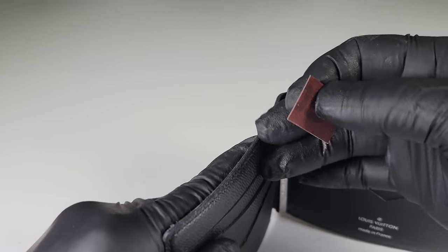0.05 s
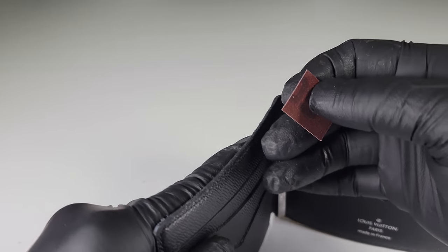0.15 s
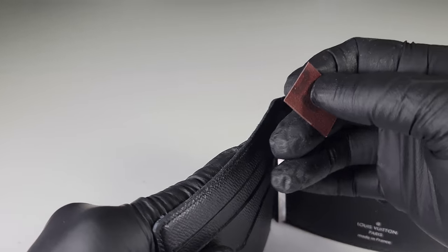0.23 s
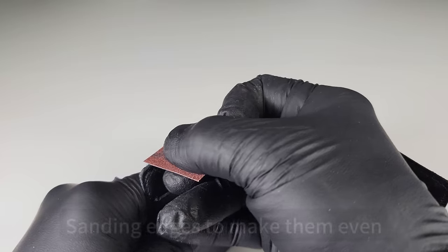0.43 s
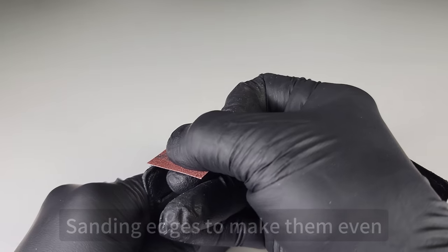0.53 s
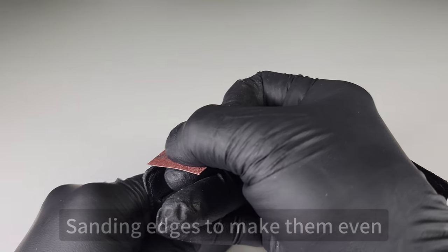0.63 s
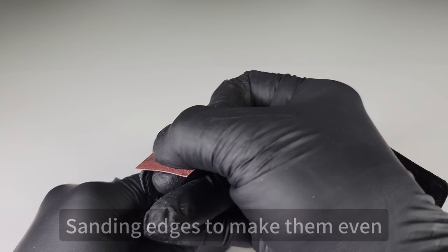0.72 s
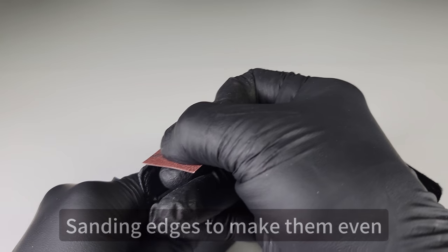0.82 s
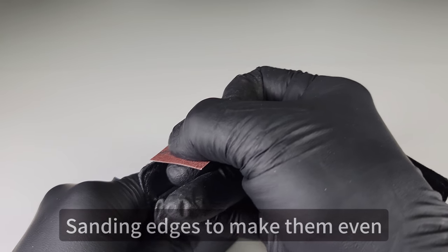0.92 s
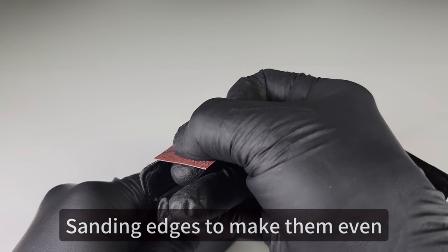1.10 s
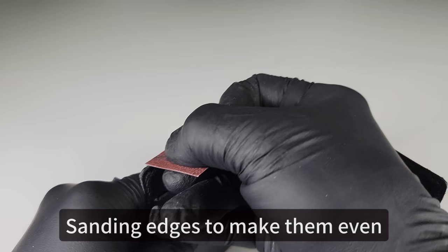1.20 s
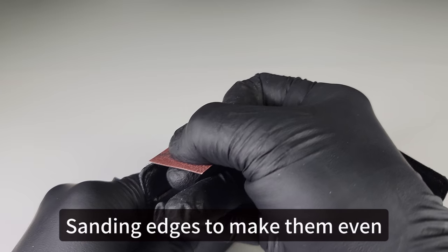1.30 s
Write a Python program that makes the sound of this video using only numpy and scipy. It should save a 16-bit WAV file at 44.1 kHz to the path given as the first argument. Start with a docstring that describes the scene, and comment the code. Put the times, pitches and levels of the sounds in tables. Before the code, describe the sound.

Close sanding of a leather edge in a quiet room: the paper slides into place, a hand knocks the table, and quick back-and-forth strokes hiss and rasp, mixed with a few sharp paper clicks and dull handling thumps.

```python
"""Gloved hands sand the edge of a leather wallet over a table, close to the microphone in a quiet room.
First the sandpaper slides into place with a light hiss, and a hand knocks the table, which rings.
Then short back-and-forth strokes begin: the grit hisses and the leather rasps. The paper snaps on
the edge, twice clearly, and the pushes of the hands rock the table with soft low thumps.
A low room murmur and faint hums lie underneath throughout."""
import sys
import numpy as np
from scipy import signal
from scipy.fft import rfft, irfft
from scipy.io import wavfile

SR = 44100
rng = np.random.default_rng(int(sys.argv[2]) if len(sys.argv) > 2 else 0)


def generate_wav(sig):
    """Save sig (samples, or channels by samples) to the path in sys.argv[1] as 16-bit PCM at SR."""
    pcm = np.round(np.clip(np.atleast_2d(sig).T, -1, 1) * 32767).astype(np.int16)
    wavfile.write(sys.argv[1], SR, pcm)


N = 59535
T, HZ = np.arange(N) / SR, np.fft.rfftfreq(N, 1 / SR)

# Strokes close to the microphone: peak_s, rise_s, fall_s, hiss_db, rasp_db
STROKES = [(0.721, 0.053, .11, -74, -60), (0.856, 0.031, 0.08, -56, -42.5), (1, 0.04, 0.027, -55.5, -47.5),
           (1.045, 0.0098, 0.023, -69.5, -59.5), (1.126, 0.066, 0.049, -58.5, -52),
           (1.242, 0.057, 0.036, -61, -52.5), (1.352, 0.035, .04, -59.5, -58)]
# Tone of the grit and of the leather: frequency_hz, density_db
GRIT_TONE = [(900, -11.5), (2000, -19), (2600, -7.5), (3200, -10.5), (4300, 0), (5100, 2), (5700, 0),
             (6300, 2), (6750, 4.5), (7200, -11), (7900, -10), (8500, -17.5), (9800, -11.5), (12500, -21),
             (16000, -26)]
RASP_TONE = [(60, -9), (150, -4), (260, 9.5), (390, 7.5), (500, -5), (800, -5), (1000, -9), (1400, -7),
             (1900, -21.5), (2500, -16), (3200, -29), (6000, -57)]
# Likeness of the two channels: frequency_hz, correlation
GRIT_LIKENESS = [(2000, 0.22), (6500, 0.57), (12000, 0.34)]
RASP_LIKENESS = [(200, 0.14), (1500, 0.21)]
# Both sit to the right: frequency_hz, left_minus_right_db
GRIT_LEAN = [(2000, -33), (4500, -8), (9000, -3.5)]
RASP_LEAN = [(200, -6.5), (650, 0), (1300, -11.5), (2500, -3)]
def sanding():
    """Each stroke drags grit over the edge: the paper hisses and the leather rasps."""
    hiss = sum(amp(db) * swell(s, rise, fall) for s, rise, fall, db, _ in STROKES)
    rasp = sum(amp(db) * swell(s, rise, fall) for s, rise, fall, _, db in STROKES)
    grit = grains()
    paper = hiss * colour(grit, GRIT_TONE, GRIT_LIKENESS, GRIT_LEAN)
    leather = rasp * colour(grit, RASP_TONE, RASP_LIKENESS, RASP_LEAN)
    return paper + leather


# Paper sliding under the glove: peak_s, rise_s, fall_s, level_db
SLIDES = [(.075, 0.12, .12, -61), (0.119, 0.017, .03, -60.5), (.205, 0.021, .04, -87),
          (.258, 0.057, 0.043, -62)]
SLIDE_TONE = [(710, -52), (1200, -23), (1410, -23), (1590, -10.5), (1900, -16), (2650, -2), (3540, -5),
              (5310, 4), (8510, -10.5), (9680, -12), (15500, -39)]  # thin hiss: frequency_hz, density_db
SLIDE_LIKENESS = [(2000, 0.43), (8000, 0.47)]  # between channels: frequency_hz, correlation
SLIDE_LEAN = [(2000, -10.5), (4500, -1), (8000, 0)]  # a little to the right: frequency_hz, left_minus_right_db
def paper_slides():
    """Without pressure the paper only hisses."""
    speed = sum(amp(db) * swell(s, rise, fall) for s, rise, fall, db in SLIDES)
    return speed * colour(grains(), SLIDE_TONE, SLIDE_LIKENESS, SLIDE_LEAN)


# A hand on the table, close by: start_s, level_db
KNOCKS = [(.2354, -11), (0.5388, -47), (0.7751, -37), (1.250, -36.5)]
# Modes of the tabletop: pitch_hz, relative_db, t60_s, left_minus_right_db
TABLE_MODES = [(98, -25, 0.18, -12.5), (172, -18, 0.14, -11), (278.2, -13, 0.094, -0.5),
               (374, -27, 0.13, 16), (475, -33, 0.036, -21.5), (607, -37.5, 0.041, -33),
               (676, -23, 0.057, -23.5), (701, -26, 0.099, -1), (836, -28, 0.065, -8)]
CRACK_TONE = [(300, -17), (1000, 10), (1500, 1.5), (1900, -9.5), (2450, 0), (3100, -17), (4000, -10),
              (6500, -17), (9000, -27), (14000, -39)]  # contact noise: frequency_hz, density_db
CRACK_LIKENESS = [(1500, 0.24)]  # between channels: frequency_hz, correlation
CRACK_LEAN = [(1500, -15.5)]  # well to the right: frequency_hz, left_minus_right_db
def table_knocks():
    """A padded blow: a tick at first contact, one push of air, a faint crack and the table's ring."""
    blow, body, t = np.zeros((2, N)), np.zeros((2, N)), T[:SR // 4]
    lead_s, push_width_s, ring_rise_s = .002, .000485, .0034
    to_right = np.array([[.05], [1]])
    push_time = (t - lead_s - .0012) / push_width_s
    push = amp(-2.5) * -push_time * np.exp((1 - push_time ** 2) / 2) * to_right
    tick = decay(t, db=-27, t60_s=.0022) * np.sin(2 * np.pi * 1800 * t) * to_right
    ring_time = t - np.array([[.0028], [.0025]])  # the left channel lags slightly
    ring = sum(pan(lean) * decay(t, db, t60) * np.sin(2 * np.pi * hz * ring_time)
               for hz, db, t60, lean in TABLE_MODES)
    ring *= 1 - np.exp(-(t / ring_rise_s) ** 2)
    crack_envelope = decay(t, db=-32, t60_s=.05) * (1 - np.exp(-t / .00026))
    for s, db in KNOCKS:
        noise = colour(rng.standard_normal((2, N)), CRACK_TONE, CRACK_LIKENESS, CRACK_LEAN)
        crack = noise[:, :len(t)] * crack_envelope
        add(blow, s - lead_s, amp(db) * push)
        add(blow, s, amp(db) * (crack + tick))
        add(body, s, amp(db) * ring)
    return body + room(blow, wet_db=-7)


# Paper snapping at the right of the microphone: start_s, peak_db, pitch_ratio
SNAPS = [(.117, -46, 1.4), (0.6937, -27.5, 0.93), (0.848, -34.5, 0.97), (1.0065, -20, 0.99)]
# Modes of the paper: base_pitch_hz, relative_db, t60_s
PAPER_MODES = [(870, 1, 0.0046), (1280, 10, 0.0032), (2270, -7, 0.0076), (3720, -16.5, 0.0022),
               (6400, -36, 0.0036)]
def paper_snaps():
    """The stiff paper flicks off the edge: a sharp pulse that dies within a few cycles."""
    out, t = np.zeros((2, N)), T[:SR // 20]
    rise_s, to_right = .00005, np.array([[-.018], [1]])
    for s, db, ratio in SNAPS:
        flick = sum(decay(t, level, t60) * np.sin(2 * np.pi * hz * ratio * t)
                    for hz, level, t60 in PAPER_MODES)
        flick *= 1 - np.exp(-t / rise_s)
        add(out, s - .0002, amp(db) * flick / flick.max() * to_right)
    return room(out, wet_db=-13.5)


# Low thumps at the microphone: start_s, level_db, pitch_hz, rise_s
THUMPS = [(0.119, -65, 130, 0.0051), (0.236, -32, 80, .012), (0.693, -27.5, 81.6, 0.0068),
          (0.753, -50, 124, .012), (0.844, -27.5, 85, 0.014), (1.042, -30.5, 115, 0.0049),
          (1.246, -37, 105, 0.0029), (1.331, -31, 67.8, 0.017)]
def table_thumps():
    """Pushes rock the table and the microphone: a few slow swings, opposite in the two channels."""
    out, t = np.zeros((2, N)), T[:SR // 4]
    opposed = np.array([[-.78], [1]])
    for s, db, hz, rise in THUMPS:
        envelope = (t / rise * np.exp(1 - t / rise)) ** 2
        add(out, s, amp(db) * envelope * np.sin(2 * np.pi * hz * t) * opposed)
    return out


# Gloved fingers shifting on the wallet: peak_s, rise_s, fall_s, level_db
SHIFTS = [(0.119, 0.011, 0.024, -57), (0.409, 0.029, 0.04, -61.5), (.58, 0.1, 0.11, -57),
          (0.711, 0.051, 0.079, -52), (.84, 0.03, 0.068, -55), (1.061, .025, 0.029, -47.5),
          (1.139, 0.062, 0.052, -55.5), (1.336, 0.04, 0.11, -53)]
SHIFT_TONE = [(50, -23), (130, 4.5), (190, 5), (280, 1.5), (370, -4), (480, -13), (600, -11.5), (700, -5.5),
              (900, -21), (1500, -28.5), (3000, -45), (10000, -69)]  # dull rub: frequency_hz, density_db
SHIFT_LIKENESS = [(150, 0.4), (600, 0.41)]  # between channels: frequency_hz, correlation
SHIFT_LEAN = [(150, 0), (600, -5.5)]  # near the centre: frequency_hz, left_minus_right_db
def finger_shifts():
    """Fingers regrip the wallet with a soft, low rub."""
    speed = sum(amp(db) * swell(s, rise, fall) for s, rise, fall, db in SHIFTS)
    return speed * colour(grains(), SHIFT_TONE, SHIFT_LIKENESS, SHIFT_LEAN)


ROOM_TONE = [(20, -5), (35, -19), (60, 3.5), (90, 1), (130, 6), (200, -11.5), (280, -6.5), (350, -20),
             (480, -19), (680, -15), (800, -21), (1100, -33.5), (1700, -38), (2600, -35.5), (3600, -37.5),
             (5200, -35), (6500, -42), (8000, -44.5), (15500, -47)]  # the quiet room: frequency_hz, density_db
ROOM_LIKENESS = [(60, -0.6), (130, 0.26), (280, .4), (600, 0.36), (1500, 0.36), (8000, 0.02)]  # between channels: frequency_hz, correlation
ROOM_LEAN = [(60, -8), (200, 1), (700, -3.5), (2400, 0)]  # stereo balance: frequency_hz, left_minus_right_db
MURMUR_DRIFT = [(0, -5.5), (.2, -4.5), (.4, 2.5), (.6, 1.5), (.95, 0.5), (1.35, 2.5)]  # the low end rises and falls: time_s, gain_db
HUMS = [(121.95, 5, -61.5), (286, 18, -69), (596.9, 12.2, -64)]  # hums in the room: pitch_hz, width_hz, base_level_db
HUM_DRIFT = [(0, -6), (.14, -2), (.33, -3), (.41, 1.5), (.5, -12), (.58, 7), (.68, -5), (.95, -1),
             (1.08, 6.5), (1.22, -5), (1.35, -13.5)]  # they waver together: time_s, gain_db
def background():
    """Low murmur, faint hiss and three wavering hums, each a narrow band of noise."""
    tone = amp(-50) * colour(rng.standard_normal((2, N)), ROOM_TONE, ROOM_LIKENESS, ROOM_LEAN)
    murmur = irfft(rfft(tone) / (1 + (HZ / 500) ** 4), N)  # below 500 Hz
    hiss = tone - murmur
    hum = sum(amp(db) * noise_band(hz, width / 2) for hz, width, db in HUMS)
    murmur_gain = amp(np.interp(T, *np.transpose(MURMUR_DRIFT)))
    hum_gain = amp(np.interp(T, *np.transpose(HUM_DRIFT)))
    return hiss + murmur_gain * murmur + hum_gain * hum * pan(-5)


# Decay of the small room around the table: frequency_hz, t60_s
ROOM_DECAY = [(150, 0.19), (600, 0.12), (3000, 0.19), (10000, 0.22)]
def room(x, wet_db):
    """The walls return a short diffuse tail, fed from the right channel."""
    t = T[:SR // 3]
    reflections = rng.standard_normal((2, len(t))) * (t > .003)
    hz, age_s, bands = signal.stft(reflections, SR, nperseg=256)
    tail = signal.istft(bands * decay(age_s, 0, read(ROOM_DECAY, hz)[:, None]), SR, nperseg=256)[1]
    wet = signal.fftconvolve(x[1:], tail / np.linalg.norm(tail[0]), axes=1)[:, :N]
    return x + amp(wet_db) * wet * pan(-1.5)


def grains(per_s=9000, spread_db=3.0, chatter_db=1.03):
    """Dense catches of single grits, clumped by the chatter of the paper."""
    chatter = noise_band(0, half_width_hz=110)
    size = amp(spread_db * np.minimum(rng.exponential(1, (2, N)), 5) + chatter_db * chatter)
    return size * rng.choice([-1, 1], (2, N)) * (rng.random((2, N)) < per_s / SR)


def swell(peak_s, rise_s, fall_s, edge_db=-19.5, flatness=2.06):
    """The speed of a stroke: a rounded rise and fall."""
    return amp(edge_db * np.maximum((peak_s - T) / rise_s, (T - peak_s) / fall_s) ** flatness)


def colour(pair, spectrum, likeness, lean):
    """Gives two unrelated signals a spectrum, a likeness and a lean to one side, at rms 1."""
    right, other = rfft(pair)
    correlation = np.clip(read(likeness), -1, 1)
    left = correlation * right + np.sqrt(1 - correlation ** 2) * other
    return unit(irfft(np.array([left, right]) * amp(read(spectrum)) * pan(read(lean)), N))


def noise_band(centre_hz, half_width_hz):
    """Noise around one frequency, at rms 1."""
    shape = 1 / (1 + ((HZ - centre_hz) / half_width_hz) ** 2)
    return unit(irfft(rfft(rng.standard_normal(N)) * shape, N))


def decay(t, db, t60_s):
    """Starts at db and falls 60 dB every t60_s."""
    return amp(db - 60 * t / t60_s)


def amp(db):
    """Decibels to gain."""
    return 10 ** (np.asarray(db) / 20)


def unit(x):
    """Scales to rms 1."""
    return x / np.sqrt(np.mean(x ** 2) + 1e-20)


def read(points, hz=HZ):
    """Reads a table on a log-frequency axis."""
    point_hz, value = np.transpose(points)
    return np.interp(np.log(hz + 1), np.log(point_hz + 1), value)


def add(mix, start_s, sound):
    """Adds a stereo sound at a time."""
    part = mix[:, max(round(start_s * SR), 0):][:, :sound.shape[1]]
    part += sound[:, :part.shape[1]]


def pan(lean_db):
    """Left and right gains; positive leans left."""
    return amp(np.array([[.5], [-.5]]) * lean_db)


def scene():
    """The handwork up close, the quiet room behind it."""
    rubbing = sanding() + paper_slides() + finger_shifts()
    return rubbing + table_knocks() + paper_snaps() + table_thumps() + background()


def record(dry, low_cut_hz=34, high_cut_hz=15700):
    """A gentle low cut under the lowest rumble, and the recorder's band limit."""
    thinned = signal.sosfilt(signal.butter(2, low_cut_hz, "highpass", fs=SR, output="sos"), dry)
    band_limit = signal.firwin(1023, high_cut_hz, window=("kaiser", 9), fs=SR)
    return signal.oaconvolve(thinned, band_limit[None], "same")


dry = scene()
out = record(dry)
generate_wav(out)
```